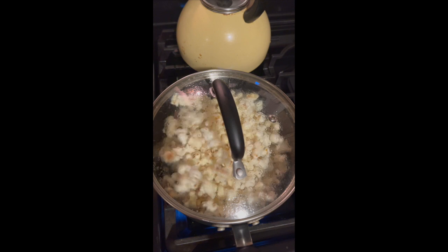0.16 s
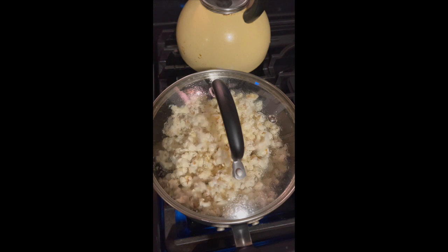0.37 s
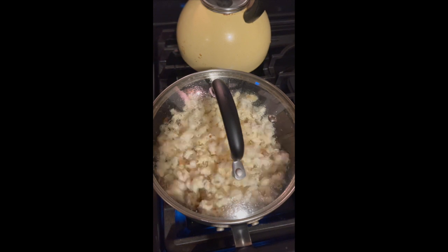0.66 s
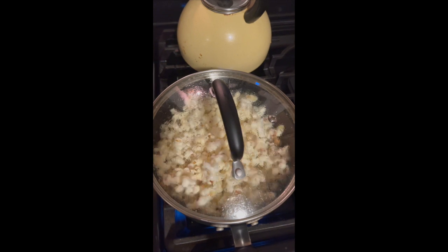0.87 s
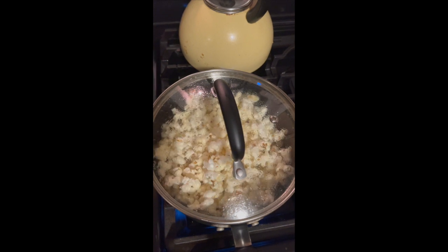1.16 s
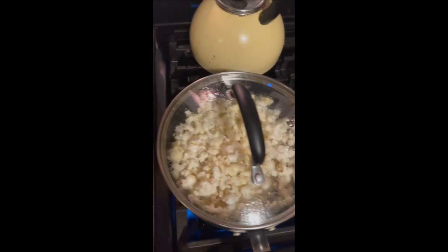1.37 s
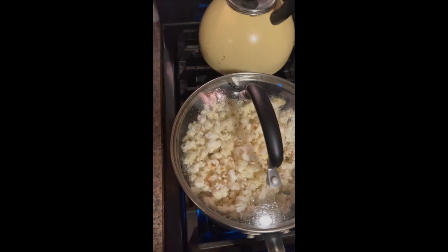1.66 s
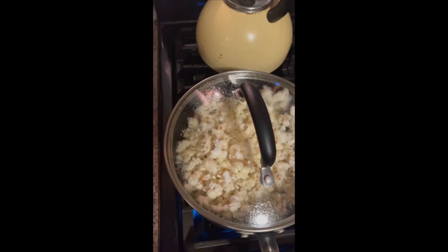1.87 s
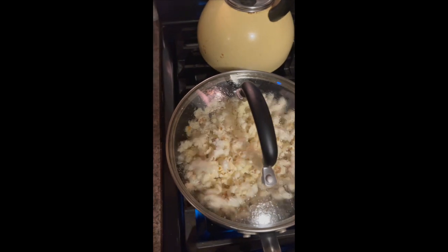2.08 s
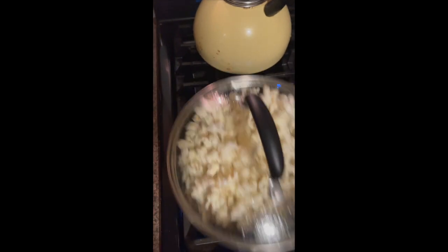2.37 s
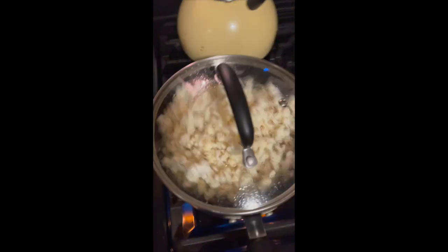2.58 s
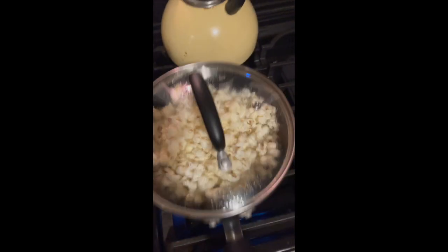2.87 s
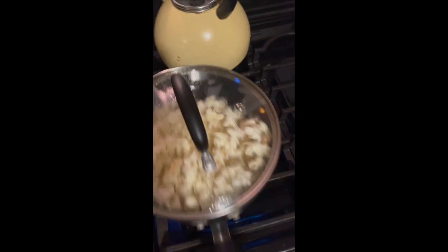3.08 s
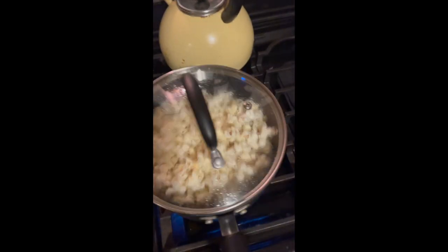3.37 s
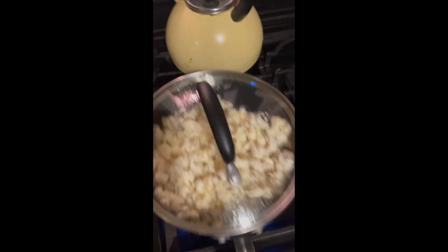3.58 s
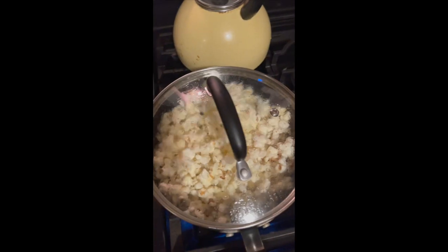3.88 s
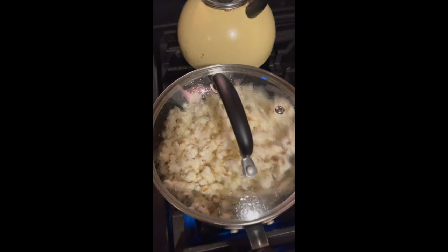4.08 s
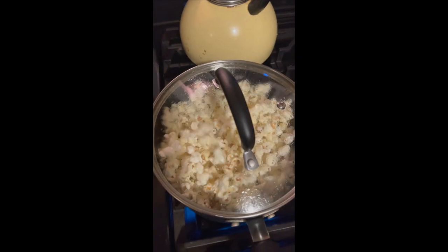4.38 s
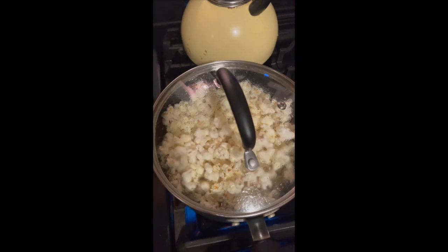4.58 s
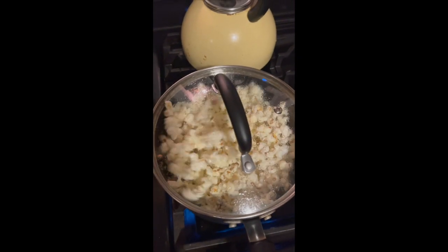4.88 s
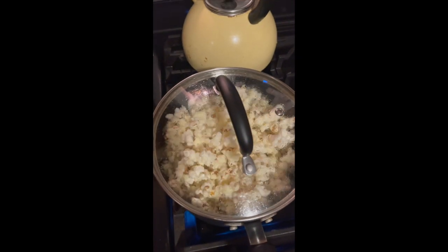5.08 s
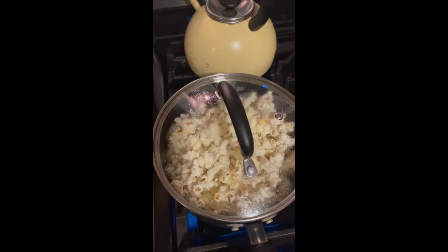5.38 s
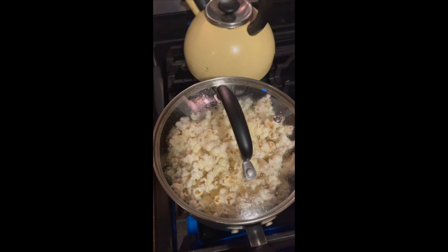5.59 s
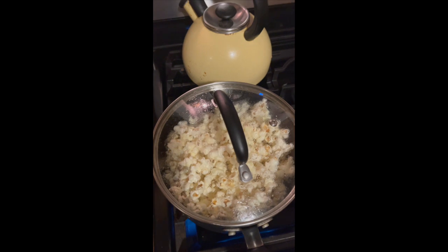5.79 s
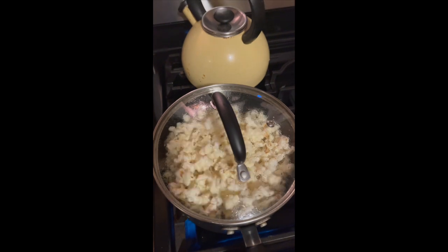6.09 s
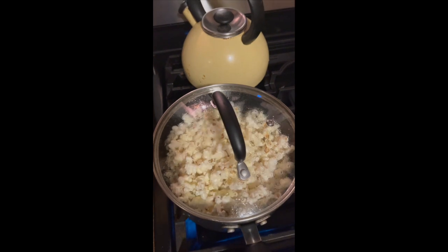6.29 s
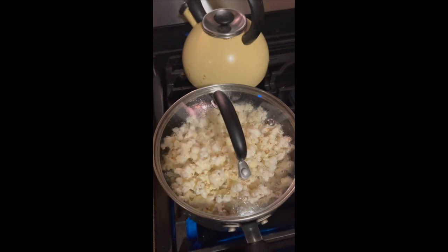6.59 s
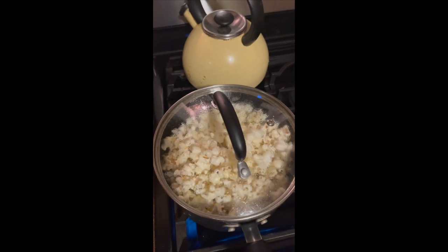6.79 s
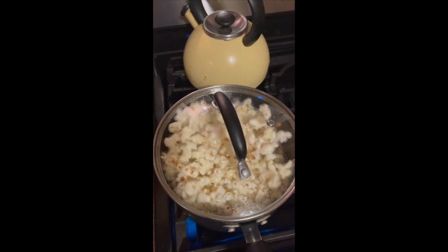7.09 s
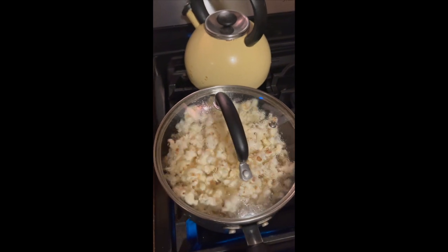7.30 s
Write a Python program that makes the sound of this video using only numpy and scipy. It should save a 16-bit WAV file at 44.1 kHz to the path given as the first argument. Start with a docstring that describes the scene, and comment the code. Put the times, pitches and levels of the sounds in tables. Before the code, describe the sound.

Close up in a small home kitchen, kernels burst under a lid with hollow, muffled thumps and dry snaps. A burst of back-and-forth pan shaking follows, metal grinding and knocking on the grate, lid jangling, popcorn clattering. It stops, and separate pops continue, sometimes in quick pairs, with a short pause before a denser finish. Soft burner rush and oil hiss stay low beneath.

```python
"""Popcorn pops in a glass-lidded pan on a gas burner, close by in a small kitchen.
Each pop is a burst of coloured noise plus a short thump of falling pitch; short hits tick and thud around it.
From about 2.4 to 3.6 s the pan is shaken on its iron grate: scraping noise grains, bumps, ringing modes.
Flame and oil hiss underneath as filtered noise and fine grains; steam leaks sputter now and then."""
import sys
import numpy as np
from scipy import signal
from scipy.fft import rfft, irfft
from scipy.io import wavfile
from scipy.ndimage import uniform_filter1d

SR = 44100
rng = np.random.default_rng(int(sys.argv[2]) if len(sys.argv) > 2 else 0)


def transcribe(u):
    """Save the signal u as a 16-bit wav file named by the first command-line argument.

    u: samples, shape (n,) or (channels, n), limited to [-1, 1]; the rate is SR.
    q: integer samples, one column per channel.
    """
    v = np.clip(np.atleast_2d(u).T, -1, 1)
    q = np.round(v * 32767).astype(np.int16)
    wavfile.write(sys.argv[1], SR, q)


N = 328545

# Event levels are relative: the functions add trims.
# kernels popping: start_s, thump_db, mean_pitch_hz, crack_db, steam_re_crack_db,
# knock_hz, knock_db, hull_ring_hz, hull_ring_db, thump_lag_s
POP_EVENTS = [(0.093, -19, 228, -39, -5, 1370, -40, 3160, -34, -0.0015),
              (0.41, -18, 220, -31, -9, 885, -36, 2460, -24.5, 0.00057),
              (0.507, -20.5, 228, -34.5, 1.5, 1970, -48, 3100, -41, 0.0012),
              (0.6426, -16.5, 246, -30, -0.5, 1910, -28, 2455, -35, -0.00044),
              (0.7146, -21.5, 243, -36, -1.5, 1820, -41, 2490, -36, 0.0019),
              (1.2336, -23, 235, -32, 3.5, 1980, -31, 2440, -34, 0.0016),
              (1.273, -20.5, 228, -31.5, 1, 1660, -36, 2450, -33.5, -0.000028),
              (1.5044, -17.5, 239, -29.5, 3, 1700, -29, 2400, -31.5, 0.00036),
              (1.714, -14.2, 233, -27, -1, 1935, -27, 2500, -33, -0.00012),
              (1.8329, -16.5, 250, -27.5, -1.5, 2010, -26, 2430, -25, -0.0017),
              (1.937, -14.1, 245, -28.5, -4, 1970, -28, 2390, -24.5, -0.00031),
              (1.9644, -23, 227, -41.5, 10, 1460, -37, 2470, -46, 0.0041),
              (2.199, -15.6, 232, -32, -4.5, 923, -29.5, 3650, -43, -0.000005),
              (2.2847, -15.5, 258, -44, -26, 860, -39, 2940, -44, 0.000054),
              (2.329, -16.5, 231, -28.5, -4, 1940, -35, 2500, -24.5, -0.00056),
              (3.849, -14, 228, -26.5, -0.5, 1330, -33, 2170, -21, 0.00033),
              (4.0903, -13.5, 228, -29, -2.5, 1360, -28, 2180, -29, -0.0011),
              (4.225, -13.5, 228, -27, -0.5, 1605, -27, 2500, -25.5, 0.00043),
              (4.4341, -15.5, 233, -30, -0.5, 1430, -30.5, 2480, -24.5, 0.00025),
              (4.4772, -21, 230, -37.5, -3, 1520, -44, 2430, -38, 0.0013),
              (4.6403, -26, 236, -43, -17, 1586, -39, 2870, -40, 0.0014),
              (4.8077, -21.0, 210, -39, -3, 1360, -37, 3040, -41, 0.0022),
              (4.8855, -12.3, 228, -27.5, -3.5, 1307, -25, 2600, -25.5, 0.0034),
              (4.9135, -12.5, 218, -29, -0.5, 1590, -26.5, 2500, -33, 0.00054),
              (5.1058, -16.5, 228, -23.5, -5.5, 1400, -32, 3065, -26.5, 0.002),
              (5.176, -24.5, 228, -46, -11, 1670, -33, 2380, -38, 0.00022),
              (5.217, -23.5, 228, -27, -1, 1620, -36, 2400, -23.5, 0.0075),
              (5.8451, -17.5, 234, -29.5, -3, 1390, -44, 2380, -31.5, 0.00038),
              (6.0204, -15, 234, -22.5, 0, 1890, -26, 3100, -34, 0.0016),
              (6.27, -19.5, 228, -33, -2.5, 1310, -33, 2450, -33.5, -0.0005),
              (6.424, -13.5, 210, -26, -1, 1600, -26, 2395, -20.5, -0.0008),
              (6.624, -20, 228, -34.5, -1.5, 1380, -40, 2440, -32.5, 0.00046),
              (6.762, -32, 227, -36, -7, 1600, -33, 2400, -34.5, -0.001),
              (6.868, -31, 240, -42, -8, 850, -38, 2670, -48, -0.0003),
              (6.9398, -18.2, 233, -31.5, -4, 1870, -33, 3050, -26, 0.0022),
              (6.9724, -16.5, 236, -32.5, -5, 1860, -36, 3060, -47, 0.0008),
              (7.0681, -14.5, 228, -27.5, -9, 1276, -31, 2370, -33, 0.0019),
              (7.0948, -14.5, 230, -29, -3, 876, -31.5, 2850, -37, -0.0012),
              (7.2056, -20, 233, -39, 2, 1640, -33, 2230, -39, 0.0018),
              (7.2723, -23, 222, -36.5, -9, 1580, -37, 2490, -39, -0.001),
              (7.3053, -20.5, 236, -25.5, -3, 1337, -24.5, 3680, -22.5, 0.0034),
              (7.384, -16, 250, -29.5, -4, 1335, -36, 2400, -30, -0.00081)]
# pan bumping over the grate bars: start_s, knock_db, clash_re_knock_db
GRATE_KNOCKS = [(2.382, -19, -17), (2.454, -35, -36), (2.512, -34, -15), (2.53, -19.5, -18),
                (2.538, -20.5, -4), (2.549, -14.5, -6.5), (2.652, -12.5, -21.5), (2.727, -40, -30),
                (2.797, -13, -15), (2.836, -12.5, -7.5), (2.949, -12.5, -47), (2.996, -43, -27),
                (3.047, -18, -26), (3.061, -15.5, -16.5), (3.132, -14, -23), (3.205, -17, -23),
                (3.306, -21, -6), (3.377, -14.5, -23), (3.451, -10.5, -24.5), (3.599, -19, -34),
                (3.64, -21.5, -25)]
# pan modes, long rings cut short in ring(): mode_hz, level_db, t60_s
PAN_MODES = [(100, -16, 0.22), (130, -1, 0.22), (193, 0.5, 0.24), (228, -5, 0.22), (563, -3, 0.12),
             (685, -14, 0.082), (820, -33, 0.064), (946, 8.5, 0.021), (1017, 0, 0.055), (1139, -9.5, 0.22),
             (1631, 1.5, 0.048), (1970, 8, 0.013), (2500, 4, 0.0094), (2900, -24, 0.085)]
# escaping steam and hard edges, spectrum: freq_hz, density_db_per_hz
FIZZ_SPECTRUM = [(1500, -90), (4000, 3), (5500, 0), (8000, 4), (10500, 5.5), (11500, -1), (13000, -16),
                 (16000, -40)]
# rattle and tearing hull, spectrum: freq_hz, density_db_per_hz
RATTLE_SPECTRUM = [(300, -17), (900, 14), (1300, 0.5), (1600, 13.5), (2000, -4), (2600, 9.5), (3200, 5),
                   (4000, 8), (5500, 1), (8500, 5.5), (11000, 3), (12300, -14), (13500, -90), (16000, -102)]
# pushes of the pan, one row each, the last feeble: scrape_db, rattle_db
PUSH_LEVELS = [(-20.5, -26), (-18, -25), (-19, -25), (-18, -27), (-34.5, -49)]

# even to-and-fro pace of the shaking, and the slide beneath it
FIRST_PUSH_S, SHAKE_PERIOD_S = 2.522, 0.26
SLIDE_START_S, SLIDE_LENGTH_S = 2.36, 1.27
# pitch all hull cracks cluster around
CRACK_HZ = 2180


def pops(tear_lead_s=0.0083, crack_db=-4, space_db=-2, hollow_db=-26, variety_db=2, note_db=1):
    """The hull splits, steam escapes, the unfolding kernel kicks the pan; returns (thumps, cracks)."""
    # spectra of hull crack and hollow knock: freq_hz, density_db_per_hz
    crack_spectrum = [(250, -14), (700, -32.5), (1120, 2), (1400, 3.5), (1900, -2.5), (2450, 3), (3400, -3),
                      (4100, -29), (5500, -2), (16000, -45)]
    hollow_spectrum = [(200, -4.5), (500, 1.5), (720, -6.5), (930, -8.5), (1150, -40.5), (3000, -14.5),
                       (16000, -82)]
    average_thump_hz, tear_db = 228, -50
    t = np.arange(SR // 6) / SR
    thumps, cracks = np.zeros(N), np.zeros((2, N))
    hz = np.geomspace(250, 16000, 40)
    crack_base = read(crack_spectrum, hz) + hump(hz, CRACK_HZ, octaves=0.81, depth_db=8.5)
    for s, kick_db, kick_hz, level_db, steam_db, knock_hz, knock_db, ring_hz, ring_db, lag_s in POP_EVENTS:
        add(thumps, s + lag_s, amp(kick_db) * thump(t, kick_hz / average_thump_hz))

        # each place in the pan colours the crack differently
        tint = crack_base + variety_db * rng.standard_normal(len(hz))
        hull = snap(np.column_stack([hz, tint]), rise_s=0.00019, decay_s=0.0048,
                    linger_db=-10, linger_s=0.011)
        steam = snap(FIZZ_SPECTRUM, rise_s=0.00034, decay_s=0.0066, linger_db=-26.5, linger_s=0.077)
        crack = amp(crack_db) * hull + amp(steam_db) * steam + amp(space_db) * lid_space(t)

        # and brings out a low and a high resonance
        knock = amp(knock_db) * note(t, knock_hz, rise_s=0.0016, decay_s=0.0044)
        hull_ring = amp(ring_db) * note(t, ring_hz, rise_s=0.0013, decay_s=0.0051)

        # the harder the kick, the louder the hollow knock
        hollow = snap(hollow_spectrum, rise_s=0.0013, decay_s=0.0022, linger_db=-24.5, linger_s=0.047)
        pop = amp(level_db) * crack + amp(note_db) * (knock + hull_ring)
        add(cracks, s, pop + amp(kick_db + hollow_db) * hollow)

        # the hull starts to tear a moment before it bursts
        tear = snap(RATTLE_SPECTRUM, rise_s=0.0031, decay_s=0.025, linger_db=-28.5, linger_s=.01)
        add(cracks, s - tear_lead_s, amp(tear_db) * tear)
    return thumps, cracks


def thump(t, stretch):
    """A bending wave in the pan, peak 1: high parts arrive first, so pitch falls and rings low modes."""
    # pan-floor modes driven by the wave: mode_hz, gain_db, t60_s
    floor_modes = [(98, 3.5, .2), (190, 12.9, .1), (292, 9.3, .027)]
    start_hz, end_hz = 555, 60  # at stretch 1
    fall_s, rise_s, decay_s = .0047, .0022, .0116
    turns = end_hz * t + (start_hz - end_hz) * fall_s * (1 - np.exp(-t / fall_s))
    envelope = np.exp(-t / decay_s) * (1 - np.exp(-(t / rise_s) ** 3))
    flex = -np.sin(2 * np.pi * turns * stretch) * envelope
    response = np.zeros(len(t))
    for hz, db, t60 in floor_modes:
        per_sample = 2 * np.log(1000) / (t60 * SR)  # makes db the gain at resonance
        response += per_sample * amp(db - 60 * t / t60) * np.cos(2 * np.pi * hz * t)
    wave = flex + convolve(flex, response)[0]
    return wave / abs(wave).max()


def snap(spectrum, rise_s, decay_s, linger_db, linger_s):
    """A coloured burst of noise with rms 1 over its first 8 ms."""
    sound = colour(burst(np.arange(SR // 6) / SR, rise_s, decay_s, linger_db, linger_s), spectrum)
    return sound / np.sqrt(np.mean(sound[:, :SR // 125] ** 2, axis=1, keepdims=True))


def burst(t, rise_s, decay_s, linger_db, linger_s, rough_db=2.5):
    """A cluster of tiny fractures, as rough noise, that lingers as it bounces about under the lid."""
    fall = np.exp(-t / decay_s) + amp(linger_db) * np.exp(-t / linger_s)
    shape = (1 - np.exp(-t / rise_s)) ** 2 * fall
    wander = unit(uniform_filter1d(rng.standard_normal(len(t)), size=40))
    rough = unit(amp(rough_db * wander))
    return shape / shape.max() * rough * rng.standard_normal((2, len(t)))


def lid_space(t, spread_octaves=0.034, spread_db=3, decay_s=0.0089):
    """Short resonances of the air under the lid, rung differently from each place in the pan."""
    # air resonances: mode_hz, level_db
    air_modes = [(1380, -0.5), (1930, -4.5), (2430, -4), (3050, 2.5), (3750, 0.5), (4520, 2)]
    hz, db = np.transpose(air_modes)[:, :, None]
    hz = hz * 2 ** (spread_octaves * rng.uniform(-1.6, 1, hz.shape))
    gain = amp(db + spread_db * rng.standard_normal(hz.shape))
    phase_turns = rng.random((2, len(hz), 1))
    rings = gain * np.sin(2 * np.pi * (hz * t + phase_turns))
    return rings.sum(1) / np.sqrt(len(hz)) * np.exp(-t / decay_s) * np.minimum(t * CRACK_HZ, 1)


def note(t, hz, rise_s, decay_s):
    """One short resonance: a sine with linear rise and exponential decay."""
    return np.sin(2 * np.pi * hz * t) * np.exp(-t / decay_s) * np.minimum(t / rise_s, 1)


def ticks(treble_db=-1, thud_stretch=1.058, thump_db=-8, ping_db=-13, punch_db=9, punch_hz=3020):
    """Short hits, each a coloured noise burst with a small low thud; returns (thuds, clicks)."""
    # kernels on lid or wall, hulls tearing just before a pop, low knocks and thuds within pops, a faint echo:
    # start_s, level_db, centre_hz, width_octaves, treble_re_level_db, thud_db
    short_hits = [(0.01, -34, 3150, 0.99, -8, -29), (0.4112, -31.5, 857, 0.11, -27, -48),
                  (0.533, -35, 3300, 6.8, -13, -36), (0.5398, -28, 3600, 0.82, -22, -27),
                  (0.549, -40, 3800, 1.6, -13, -42), (0.5638, -39, 3300, 3.9, -16, -45),
                  (0.731, -38, 1860, 1.9, -1, -21), (0.772, -31.5, 3130, 0.75, -10, -27),
                  (0.794, -48, 3100, 2.6, -10, -40), (1.283, -39, 2330, 1.4, 1, -36),
                  (1.5146, -47, 2000, 2, -6, -14.5), (1.878, -35.5, 2240, 1.4, -19, -34),
                  (2.003, -19.5, 3300, 0.77, -12.5, -27), (2.042, -48, 2700, 2.5, -17, -49),
                  (2.2205, -27.5, 1980, 1.65, -5, -21), (2.336, -25, 2600, 1.4, 0.5, -20),
                  (2.587, -24, 2100, 1.1, -15, -21), (2.698, -50, 3470, 2, -9, -31),
                  (2.863, -22, 1430, 1.6, -22, -30), (2.951, -25.5, 1560, 0.88, -28, -16),
                  (2.968, -36.5, 2530, 1, 9.5, -35), (3.134, -29, 2400, 1.5, -13, -22),
                  (3.373, -32, 1990, 0.94, -28, -13), (3.452, -35, 2200, 1.4, -10, -33),
                  (3.476, -26, 1530, 1.9, -12.5, -37), (3.6248, -36, 1920, 1.7, -11, -32),
                  (4.086, -41, 1800, 2.6, -4, -36), (4.093, -34, 620, 0.73, -25, -45),
                  (4.105, -32.5, 2020, 1.4, 3.5, -32), (4.2217, -47, 2200, 2.6, -3, -48),
                  (4.2262, -35, 794, .9, -25, -47), (4.498, -39, 2780, 2.2, 2, -43),
                  (4.538, -35.5, 1800, 1.6, -6, -24), (4.6444, -38.5, 2470, 3.8, -7, -45),
                  (5.133, -37, 2570, 0.74, -2, -33), (5.299, -36, 3850, 0.63, -7, -35),
                  (5.4678, -35.5, 2470, 1.14, -3, -28), (5.512, -38.5, 2860, 1, -4.5, -38),
                  (5.9585, -37.5, 2050, 1.3, 3, -33), (6.0571, -32, 1790, 1.7, 0.5, -17.5),
                  (6.072, -34, 1810, 2.1, -2, -19.5), (6.42, -36, 1880, 2.9, -3, -47),
                  (6.4255, -34, 850, 0.64, -25, -43), (6.826, -45, 1710, 2.4, -10, -41),
                  (6.9942, -31.5, 2850, 0.43, -10, -40), (7.318, -30, 2900, 1.6, 4, -33)]
    # treble slope shared by the hits: freq_hz, density_db_per_hz
    top_spectrum = [(8000, -1), (11500, -8), (13000, -30), (16000, -16)]
    # short ping of the glass: mode_hz, level_db, t60_s
    glass_modes = [(2850, -7, 0.021), (3016, 5, 0.04), (3300, -1, .04), (3664, -2, 0.043), (4000, 1, 0.057),
                   (4480, 6, 0.088)]
    t = np.arange(SR // 6) / SR
    thuds, clicks, on_glass = np.zeros(N), np.zeros((2, N)), np.zeros((2, N))
    hz = np.geomspace(250, 16000, 40)
    for s, db, centre_hz, width, bright_db, thud_db in short_hits:
        tint = read(top_spectrum, hz) + hump(hz, centre_hz, octaves=width, depth_db=22.5)
        tick = snap(np.column_stack([hz, tint]), rise_s=0.00016, decay_s=0.0043,
                    linger_db=-17, linger_s=0.005)
        edge = snap(FIZZ_SPECTRUM, rise_s=0.00031, decay_s=0.00097, linger_db=-17.5, linger_s=0.016)
        add(clicks, s, amp(db) * (tick + amp(bright_db + treble_db) * edge))

        # the nearer a hit is centred to 3200 Hz, the more it rings the glass
        glass = amp(db + hump(centre_hz, 3200, octaves=0.13, depth_db=19))
        add(on_glass, s, glass * tick)
        add(clicks, s, amp(punch_db) * glass * note(t, punch_hz, rise_s=0.00026, decay_s=0.0021))
        add(thuds, s, amp(thud_db + thump_db) * thump(t, thud_stretch))
    return thuds, clicks + amp(ping_db) * ring(on_glass, glass_modes)


def showers(contact_s=0.0021):
    """Light flakes patter on the lid at uneven moments, each a tiny dry scratch of noise."""
    # popcorn thrown against the lid: start_s, length_s, level_db
    shower_rows = [(0.522, 0.058, -43.5), (2.003, 0.028, -60), (2.535, 0.027, -26), (2.79, 0.01, -22),
                   (2.832, 0.016, -35), (3.049, 0.024, -29.5), (3.296, 0.012, -27.5), (4.445, 0.044, -46),
                   (4.638, 0.024, -51), (4.914, 0.05, -46), (5.136, .02, -56), (6.035, 0.02, -40.5),
                   (6.977, 0.026, -49), (7.1, 0.022, -44), (7.307, .03, -51)]
    # flake on glass, spectrum: freq_hz, density_db_per_hz
    flake_spectrum = [(800, -13), (1800, -4), (3000, -5), (5000, 0.5), (7500, 1.5), (11000, -3),
                      (12500, -26), (16000, -55)]
    level = sum(amp(db) * swell(s, 0.0017, length_s, fall_db_per_s=341) for s, length_s, db in shower_rows)
    t = np.arange(SR // 100) / SR
    hits = grains(per_s=900, spread_db=1)[0] ** 2
    power = abs(convolve(hits, np.exp(-2 * t / contact_s)))
    patter = np.sqrt(power) * rng.standard_normal((2, N))
    return colour(level * unit(patter), flake_spectrum)


def crumbs(level_db=-11, flight_s=.11, count=5):
    """After each pop a few bits of hull fly off and land as tiny sine ticks."""
    t, out = np.arange(SR // 50) / SR, np.zeros(N)
    for (s, _, _, crack_db, *_), draws in zip(POP_EVENTS, rng.random((len(POP_EVENTS), count, 3))):
        for when, pitch, size in draws:
            bit = note(t, 1400 * 5 ** pitch, rise_s=.0002, decay_s=.0018)
            gain = amp(crack_db + level_db) * size * (1 - when / 2)  # later bits are weaker
            add(out, s + flight_s * (when + 0.19), gain * bit)
    return out


def shake(scrape_db=-3, rattle_db=-6, clatter_db=-6, knock_db=-9, clash_db=-2, ring_db=-11,
          scrape_ring_db=-11, lid_db=-3):
    """The pan judders over the grate and bumps its bars while kernels rattle and the lid jangles."""
    # scraping, spectrum: freq_hz, density_db_per_hz
    scrape_spectrum = [(25, -22), (60, -14), (105, -5), (145, -5), (195, 1), (300, -0.5), (430, -10.5),
                       (800, -11.5), (1030, -25.5), (1300, -24.5), (2500, -35), (8000, -67)]
    grind_spectrum = [(25, -41), (60, -28.0), (400, 2.0), (1000, -11.0), (1700, -15.0),
                      (4000, -17.5), (16000, -14.0)]
    scrape, jolt = strokes()
    t = np.arange(SR // 5) / SR
    slips = grains(per_s=760, spread_db=1.0) * scrape
    rattle = amp(rattle_db) * jolt * grains(per_s=3000, spread_db=1.5)
    bumps = np.zeros((2, N))
    for s, db, metal_db in GRATE_KNOCKS:
        bump = burst(t, rise_s=0.0009, decay_s=0.024, linger_db=-13, linger_s=0.026)
        add(bumps, s, amp(db + knock_db) * bump)
        add(rattle, s, amp(db + metal_db + clash_db) * chatter(t))

    force = amp(scrape_db) * slips + bumps
    grind = colour(force, grind_spectrum)
    pan = ring(amp(ring_db) * rattle + amp(scrape_ring_db) * grind, PAN_MODES)
    metal = pan + amp(lid_db) * jangle(rattle)
    kernels = amp(clatter_db) * jolt * clatter(SLIDE_START_S, SLIDE_START_S + SLIDE_LENGTH_S)
    return colour(force, scrape_spectrum, size=8192) + colour(rattle, RATTLE_SPECTRUM) + kernels + metal


def strokes():
    """How hard pan scrapes and kernels rattle to and fro: powers of slide, pushes and pulls add up."""
    rise_s, hold_s, scrape_fall_db_per_s, rattle_fall_db_per_s = 0.021, 0.029, 143, 172
    slide_scrape_db, slide_rattle_db, rest_db_per_s = -34, -45.5, 135
    # the pull back is gentler than the push and hardly throws the kernels
    pull_after_s, pull_scrape_db, pull_rattle_db = 0.14, -6.5, -11.5

    # between strokes the pan keeps sliding, then comes to rest
    slide = swell(SLIDE_START_S, rise_s, SLIDE_LENGTH_S, rest_db_per_s)
    scrape = (amp(slide_scrape_db) * slide) ** 2
    rattle = (amp(slide_rattle_db) * slide) ** 2
    for k, (scrape_db, rattle_db) in enumerate(PUSH_LEVELS):
        push_s = FIRST_PUSH_S + k * SHAKE_PERIOD_S
        push = (push_s, scrape_db, rattle_db)
        pull = (push_s + pull_after_s, scrape_db + pull_scrape_db, rattle_db + pull_rattle_db)
        for s, low_db, high_db in [push, pull]:
            scrape += (amp(low_db) * swell(s, rise_s, hold_s, scrape_fall_db_per_s)) ** 2
            rattle += (amp(high_db) * swell(s, rise_s, hold_s, rattle_fall_db_per_s)) ** 2
    return np.sqrt(scrape), np.sqrt(rattle)


def chatter(t, decay_s=0.037, bed_db=-6, bounces_per_s=420, contact_s=.0014):
    """The lid rim lands hard and rebounds at uneven intervals, ever more weakly, over a fine rustle."""
    bounces = rng.standard_normal((2, len(t))) * (rng.random(len(t)) < bounces_per_s / SR)
    bounces[:, 0] = 2
    hits = convolve(bounces, np.exp(-t / contact_s) * rng.standard_normal(len(t)))
    rustle = amp(bed_db) * rng.standard_normal(hits.shape)
    return (unit(hits) + rustle) * np.exp(-t / decay_s)


def jangle(rattle, spread_db=4, spread_octaves=0.0299):
    """The lid shifts on its seat as the pan is pushed, so its modes ring a little differently."""
    # glass lid and steel rim, long rings cut short in ring(): mode_hz, level_db, t60_s
    lid_modes = [(960, -1.5, 0.23), (1027, 5.5, 0.13), (1660, 1.5, 0.068), (1900, -33, .05),
                 (2240, 1, 0.084), (2400, 4.5, 0.097), (2783, 2, 0.082), (3370, -12, 0.067),
                 (3715, 4, 0.099), (3700, -3.5, 0.18), (4640, 6, 0.11), (5200, -4, 0.048), (6545, -8, .08),
                 (7520, 3, 0.097)]
    seats = len(PUSH_LEVELS) - 1  # the feeble last push keeps the seat before it
    stroke = np.clip((np.arange(N) / SR - FIRST_PUSH_S) // SHAKE_PERIOD_S, 0, seats - 1)
    out = np.zeros((2, N))
    for k, draws in enumerate(rng.standard_normal((seats, len(lid_modes), 2))):
        modes = [(hz * 2 ** (spread_octaves * a), db + spread_db * b, t60)
                 for (hz, db, t60), (a, b) in zip(lid_modes, draws)]
        out += ring(rattle * (stroke == k), modes)
    return out


def clatter(start_s, end_s, ring_s=0.0069, count=700):
    """Kernels and lid rim hit at random spots, each with its own short ring; rms 1 while it lasts."""
    t, out = np.arange(SR // 50) / SR, np.zeros((2, N))
    for when, pitch, size, side in rng.random((count, 4)):
        hz = 520 * 9 ** pitch
        hit = (1 + 3 * size ** 3) * np.sin(2 * np.pi * hz * t) * np.exp(-t / ring_s)
        channel_gains = [np.cos(2 * np.pi * side), np.sin(2 * np.pi * side)]
        add(out, start_s + when * (end_s - start_s), np.outer(channel_gains, hit))
    return unit(out) * np.sqrt((end_s - start_s) * SR / N)


def jolts(level_db=-4, stretch=1.106):
    """Each bump over the grate also flexes the pan floor into a thump."""
    t, out = np.arange(SR // 6) / SR, np.zeros(N)
    for s, db, _ in GRATE_KNOCKS:
        add(out, s, amp(db + level_db) * thump(t, stretch))
    return out


def ring(x, modes, longest_s=.2):
    """The modes of pan, lid or glass, rung by a force; the heap of popcorn cuts long rings short."""
    t = np.arange(SR // 2) / SR
    response = sum(amp(db - 60 * t / min(t60, longest_s)) * np.sin(2 * np.pi * hz * t)
                   for hz, db, t60 in modes)
    return convolve(x, response / np.linalg.norm(response))


def leaks(flutter_db=3.0):
    """Steam sputters out of kernels into the oil: a narrow, unsteady hiss of grains."""
    # leaking kernels: start_s, length_s, level_db
    leak_rows = [(0, 0.38, -63.5), (0.933, 0.17, -57.5), (4.587, 0.76, -57), (6.742, 0.53, -61)]
    # steam, spectrum: freq_hz, density_db_per_hz
    steam_spectrum = [(1000, -8), (2200, 4), (3400, 3.5), (4400, 7), (6000, -8), (8000, -9), (10500, -26),
                      (12000, -41), (16000, -68)]
    level = sum(amp(db) * swell(s, 0.042, length_s, fall_db_per_s=88) for s, length_s, db in leak_rows)
    flutter = amp(flutter_db * unit(uniform_filter1d(rng.standard_normal(N), size=1200)))
    return level * flutter * colour(grains(per_s=9000, spread_db=0.0), steam_spectrum)


def burner(flame_db=-51):
    """The gas flame rushes with a hollow band of hiss; oil sizzles in fine grains."""
    # spectra of flame and oil: freq_hz, density_db_per_hz
    flame_spectrum = [(20, -24), (33, -6), (50, 9.5), (70, -0.5), (130, -1), (240, -2), (400, -13.5),
                      (900, -12.5), (1100, -22.5), (1300, -7), (1450, -2), (1700, -27), (6000, -76),
                      (16000, -84)]
    oil_spectrum = [(800, 12), (2000, 4), (3200, 2), (4500, 6.5), (6000, -5.5), (8000, -3), (10200, 8),
                    (11200, -16), (16000, -42)]
    flame = amp(flame_db) * colour(rng.standard_normal((2, N)), flame_spectrum, size=8192)
    heat = sizzle()
    return flame + heat * colour(grains(per_s=12000, spread_db=5.0), oil_spectrum)


def sizzle(simmer_db=-59.5, flare_re_thump_db=-38.5, flare_fall_db_per_s=32):
    """How hard the oil sizzles: a steady simmer and a flare as each pop wets it."""
    power, t = np.full(N, amp(simmer_db) ** 2), np.arange(SR) / SR
    for s, kick_db, *_ in POP_EVENTS:
        add(power, s, amp(kick_db + flare_re_thump_db - flare_fall_db_per_s * t) ** 2)
    return np.sqrt(power)


def kitchen(x, gap_s, build_s):
    """A diffuse tail that builds up shortly after the sound, each band dying at its own speed."""
    # decay of the kitchen: freq_hz, t60_s
    room_decay = [(80, .28), (210, .3), (560, .3), (1500, .36), (4000, .42), (10000, .27), (16000, .17)]
    hz, t, z = signal.stft(rng.standard_normal((2, SR // 2)), SR, nperseg=256)
    decay = amp(-60 * t / read(room_decay, hz)[:, None])
    tail = signal.istft(z * decay, SR, nperseg=256)[1]
    tail *= np.clip((np.arange(tail.shape[1]) / SR - gap_s) / build_s, 0, 1)
    return convolve(x, tail / np.linalg.norm(tail[0]))


def ports(x):
    """Two microphone ports a hand apart hear partly the same sound, shifted in phase."""
    # likeness and lead apply fully from 400 Hz up:
    # freq_hz, likeness_0_to_1, left_lead_rad, left_minus_right_db
    port_table = np.array([(97.7, 0.94, 0.05, -1), (280, 0.97, -0.2, 0.9), (584, 0.56, -0.5, -2),
                           (1210, 0.84, 0.14, -3), (1940, 1, -0.68, 1), (3560, 0.14, 0, -1.5),
                           (4520, 0.25, 3, 0.5), (5036, 1, 1.5, -5.5), (5103, 0.62, 6.5, 1),
                           (6950, 1, 7.5, -1), (10070, 1, 10, 0), (10400, 0.82, 10.5, -1),
                           (12600, 1, 12.5, 1.5), (14100, 1, 13, -3), (15900, 1, 18, 3)])
    hz = np.fft.rfftfreq(N + SR, 1 / SR)
    same, lead, balance_db = (read(port_table[:, [0, k]], hz) for k in range(1, port_table.shape[1]))
    # long waves reach both ports alike
    short = np.clip(hz / 400, 0, 1)
    same, lead = 1 - (1 - np.clip(same, 0, 1)) * short, lead * short
    shared, apart = rfft(x, N + SR)
    right = (same * shared + np.sqrt(1 - same ** 2) * apart) * np.exp(-1j * lead)
    return irfft([shared * amp(balance_db / 2), right * amp(-balance_db / 2)], N + SR)[:, :N]


def amp(db):
    """Decibels to gain."""
    return 10 ** (np.asarray(db) / 20)


def unit(x):
    """Scales to rms 1."""
    return x / np.sqrt(np.mean(x ** 2) + 1e-20)


def read(points, hz):
    """Reads (Hz, value) points on a log-frequency axis."""
    f, value = np.transpose(points)
    return np.interp(np.log(hz + 1), np.log(f + 1), value)


def hump(hz, centre_hz, octaves, depth_db):
    """A broad resonance in dB: 0 at its centre, -depth_db far away."""
    return depth_db * (np.exp(-(np.log2(hz / centre_hz) / octaves) ** 2) - 1)


def add(mix, s, sound):
    """Mixes a sound in at time s."""
    part = mix[..., max(round(s * SR), 0):][..., :sound.shape[-1]]
    part += sound[..., :part.shape[-1]]


def convolve(x, response):
    """Passes one or two channels through an impulse response."""
    return signal.fftconvolve(np.atleast_2d(x), np.atleast_2d(response), axes=1)[:, :x.shape[-1]]


def colour(x, spectrum, size=4096):
    """Causal minimum-phase filter of unit energy with the given spectrum."""
    log_gain = np.log(amp(read(spectrum, abs(np.fft.fftfreq(size, 1 / SR)))))
    taps = np.fft.ifft(np.exp(np.conj(signal.hilbert(log_gain)))).real[:size // 2]
    return convolve(x, taps / np.linalg.norm(taps))


def grains(per_s, spread_db):
    """Two trains of tiny random impacts of uneven size, rms 1."""
    size = amp(spread_db * np.minimum(rng.exponential(1, (2, N)), 4))
    return unit(rng.standard_normal((2, N)) * size * (rng.random((2, N)) < per_s / SR))


def swell(start_s, rise_s, hold_s, fall_db_per_s):
    """An envelope over the whole scene: straight rise, hold, steady fall in dB."""
    t = np.arange(N) / SR - start_s
    return np.clip(t / rise_s, 0, 1) * amp(-fall_db_per_s * np.maximum(t - rise_s - hold_s, 0))


def scene(ring_db=-13, thump_ring_db=-30, thump_room_db=-15, sharp_room_db=-10.0, shake_room_db=-10):
    """Pops, short hits and shaking in the kitchen, over burner and steam leaks."""
    thumps, cracks = pops()
    thuds, clicks = ticks()
    sharp = cracks + clicks + showers() + crumbs()
    low = thumps + thuds + jolts()
    sharp = sharp + amp(ring_db) * ring(sharp, PAN_MODES)
    # the heap of popcorn soon stops the ring of a thump
    low = low + amp(thump_ring_db) * ring(low, PAN_MODES, longest_s=.13)
    shaking = shake()
    room = kitchen(amp(sharp_room_db) * sharp + amp(shake_room_db) * shaking, gap_s=0.00051, build_s=0.0015)

    # bass returns late from the far walls; two tails trade places over time so that thumps differ
    place = 2 * np.pi * 1.3 * np.arange(N) / SR
    tails = sum(kitchen(low * share, gap_s=0.0099, build_s=0.034) for share in (np.cos(place), np.sin(place)))
    boom = amp(thump_room_db) * tails
    return low + ports(sharp + shaking + room + boom + burner() + leaks())


def record(dry, ceiling=0.63, low_cut_hz=34, edge_hz=16300):
    """The microphone loses the deepest bass and rounds the largest peaks; then the band limit."""
    high_pass = signal.butter(2, low_cut_hz, "high", fs=SR, output="sos")
    thinned = signal.sosfilt(high_pass, dry)
    rounded = ceiling * np.tanh(thinned / ceiling)
    band_limit = signal.firwin(511, edge_hz, window=("kaiser", 9), fs=SR)
    return signal.oaconvolve(rounded, band_limit[None], "same")


dry = scene()
out = record(dry)
transcribe(out)
```